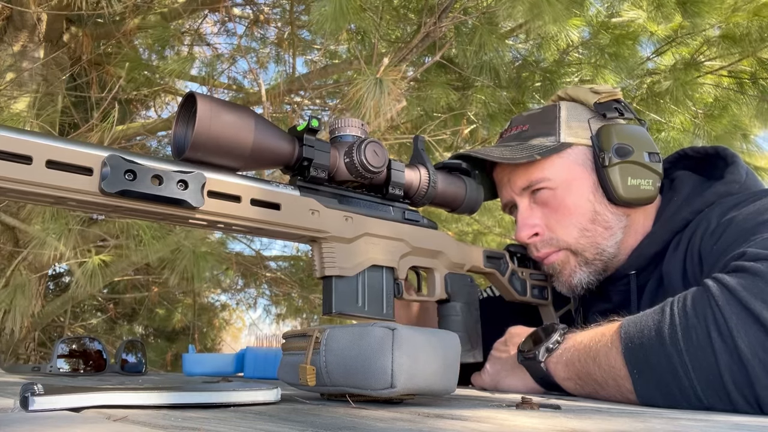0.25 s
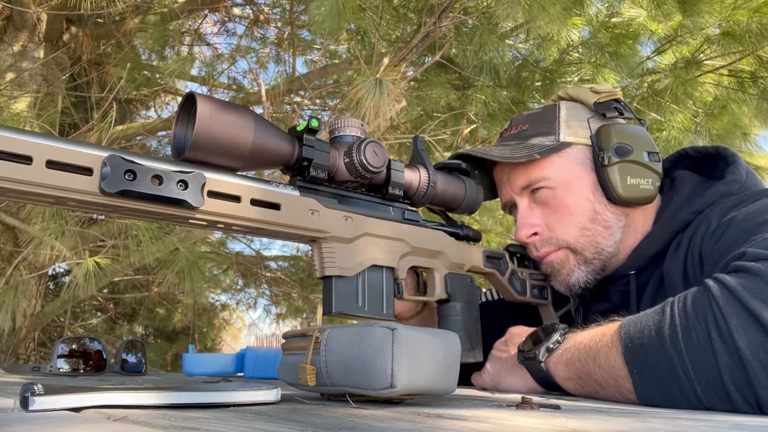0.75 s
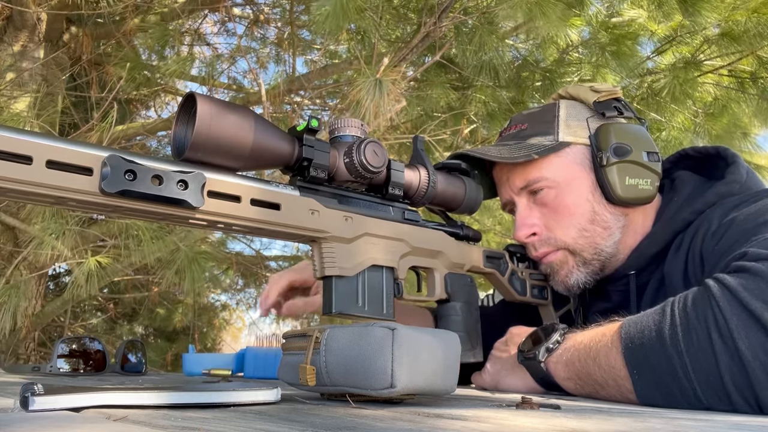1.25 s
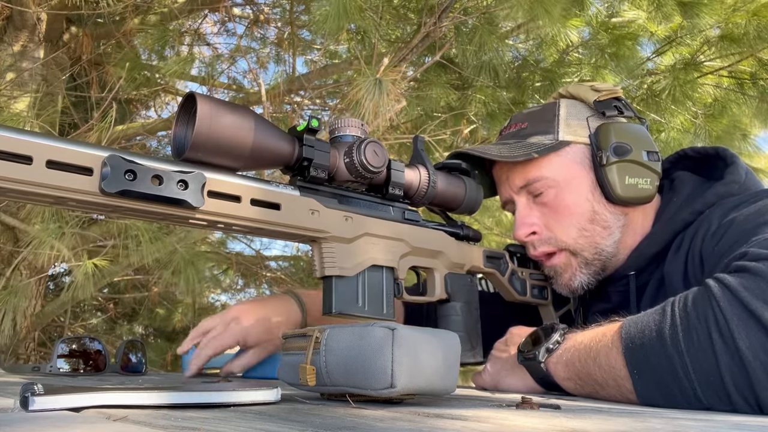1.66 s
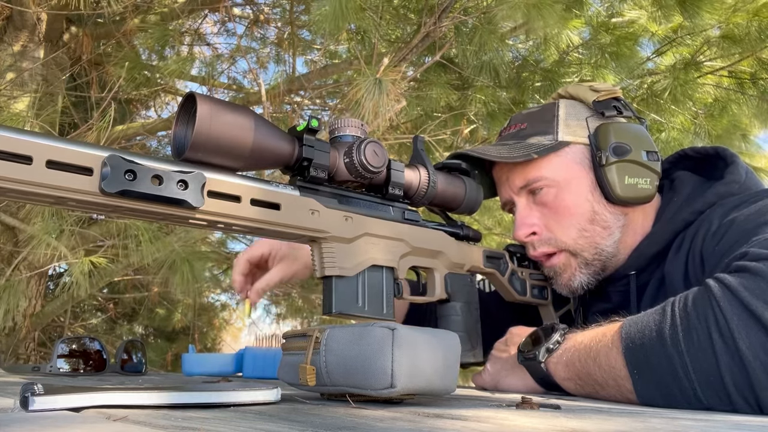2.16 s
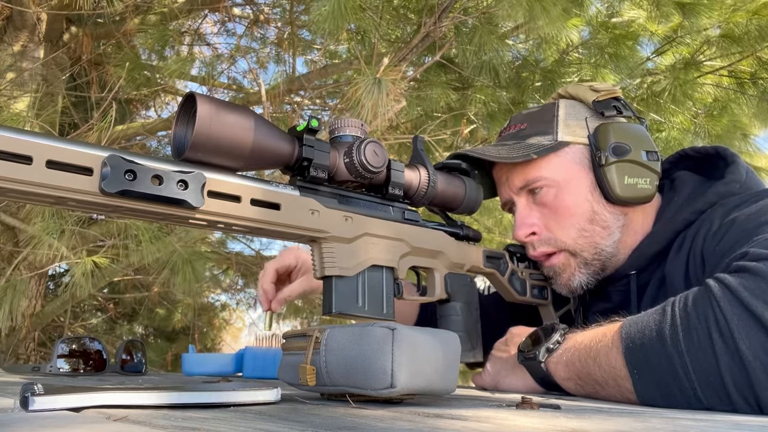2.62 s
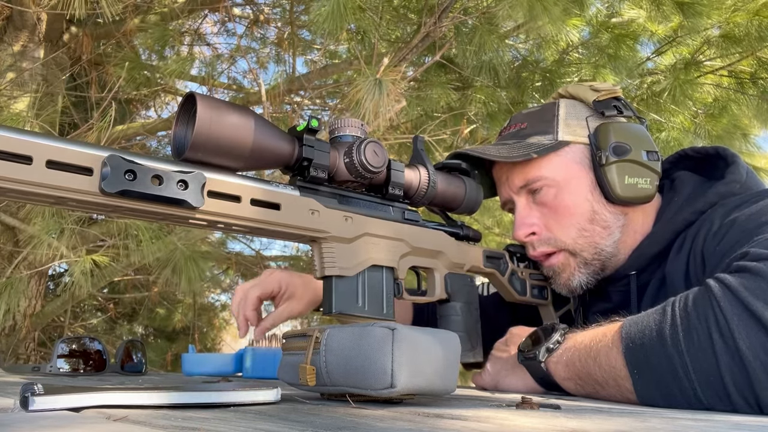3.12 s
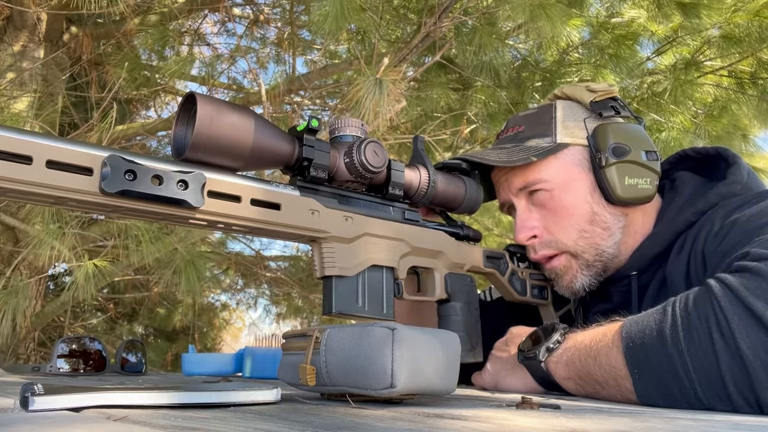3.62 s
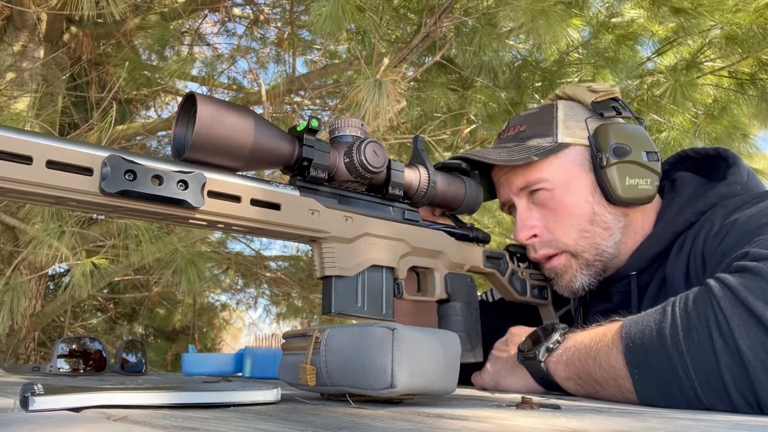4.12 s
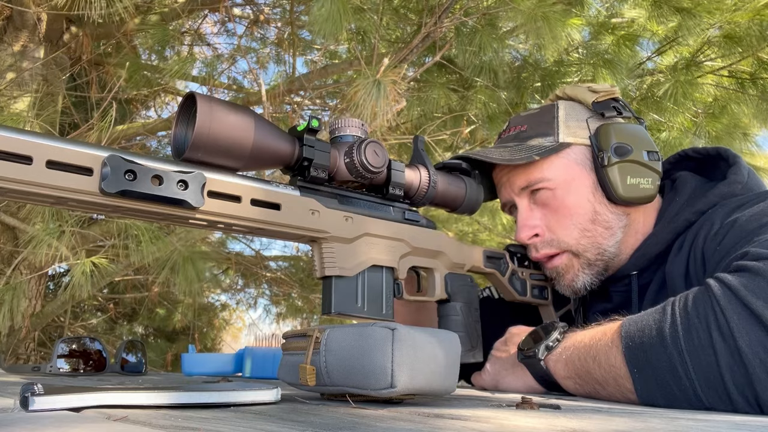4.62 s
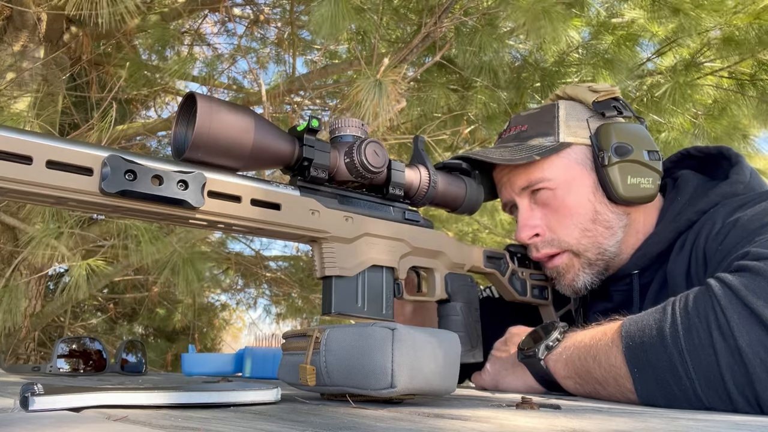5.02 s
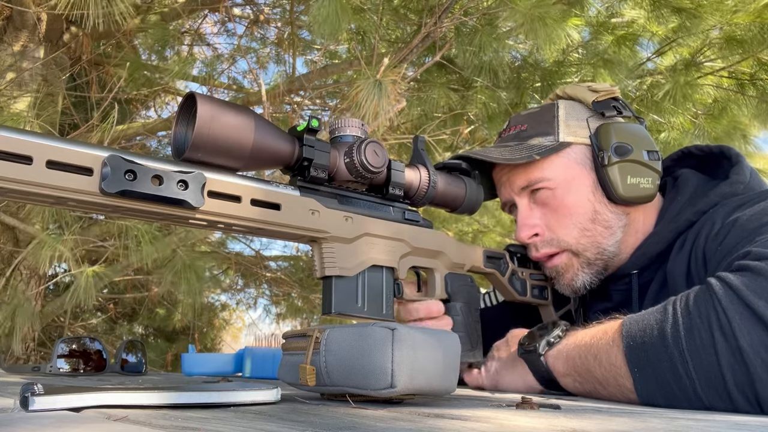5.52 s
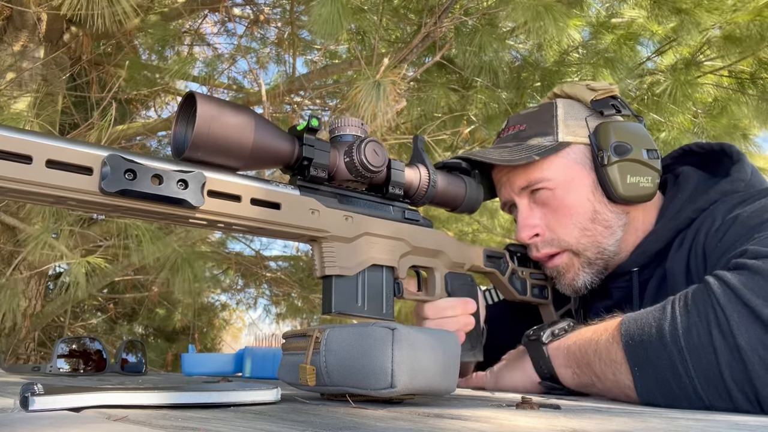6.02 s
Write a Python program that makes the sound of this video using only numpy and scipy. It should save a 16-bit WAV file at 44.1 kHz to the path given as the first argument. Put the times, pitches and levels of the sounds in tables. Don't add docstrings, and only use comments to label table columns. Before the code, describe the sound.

Close, sharp steel clacks of a rifle bolt being worked on a wooden bench outdoors, with small hand knocks and distant bird chirps.

```python
import sys
import numpy as np
from scipy import signal
from scipy.fft import rfft, irfft, next_fast_len
from scipy.io import wavfile

SR = 44100
rng = np.random.default_rng(int(sys.argv[2]) if len(sys.argv) > 2 else 0)


def boost(x):
    u = np.asarray(x, float) / 20
    return 10 ** u


def inscribe(sig):
    pcm = np.round(np.clip(np.atleast_2d(sig).T, -1, 1) * 32767)
    wavfile.write(sys.argv[1], SR, pcm.astype(np.int16))


N = 276286

# (pitch [Hz], level [dB], time to fall 60 dB [s])
STEEL_MODES = [(2000, -7, 0.012), (2850, -14, .05), (3200, -5, .013), (4100, -6.5, .008), (5300, -1, .011),
               (6208, -5, .013)]
# (pitch [Hz], level [dB], time to fall 60 dB [s])
STEEL_TOP_MODES = [(11600, 5.9, .004), (13200, 4, 0.0035)]
# (pitch [Hz], level [dB], time to fall 60 dB [s])
CHASSIS_MODES = [(370, -12.5, 0.048), (439, -11.5, 0.077), (787, -13.5, 0.13), (813.4, -8, 0.094),
                 (879, 2.5, 0.036), (914, -6, .06), (1130, -8.5, 0.022)]


def unit(x):
    return x / np.sqrt(np.mean(x ** 2) + 1e-20)


def band(x, low_hz, high_hz):
    edges = [low_hz, min(high_hz, .45 * SR)]
    return signal.sosfilt(signal.butter(2, edges, "band", fs=SR, output="sos"), x)


def low_pass(x, order, cut_hz):
    return signal.sosfilt(signal.butter(order, cut_hz, fs=SR, output="sos"), x)


def at_hz(points, hz):
    table_hz, value = np.transpose(points)
    return np.interp(np.log(hz), np.log(table_hz), value)


def drift(rate, rows=1):
    knots = rng.standard_normal((rows, 700))
    return np.array([np.interp(np.arange(N) * rate / SR, np.arange(700), k) for k in knots])


def decays(modes, seconds=0.23):
    hz, db, t60 = np.transpose(modes)[:, :, None]
    t = np.arange(int(seconds * SR)) / SR
    return boost(db - 60 * t / t60) * np.sin(2 * np.pi * hz * t)


def add(track, s, sound):
    i = int(s * SR)
    track[i:i + len(sound)] += sound[:N - i]


def grains(per_s, size_db):
    sizes = boost(size_db * np.minimum(rng.exponential(1, N), 5)) * rng.choice([-1, 1], N)
    return sizes * (rng.random(N) < per_s / SR)


def strokes(rows, rise_s, fall_s, tail_db, tail_s):
    t, out = np.arange(N) / SR, 0
    for s, length, *level_db in rows:
        after = np.maximum(t - s - length, 0)
        swell = np.exp(np.minimum(t - s, 0) / rise_s)
        fall = np.exp(-after / fall_s) + boost(tail_db) * np.exp(-after / tail_s)
        out = out + boost(level_db)[:, None] * swell * fall
    return out


def contacts(rows, bodies, edges_hz, crack_db, cloud_db, cloud_t60, accent_db, accent_t60, uneven_db, spread):
    out, t = np.zeros(N), np.arange(6000) / SR
    modes = [decays(b, seconds=6000.5 / SR) for b in bodies]
    lead_s, early = 0.012, t[:1300]
    lead_in = boost(-21) * np.exp(np.minimum(early - lead_s, 0) / 0.0016) * (early < lead_s)
    chance = rng.standard_normal((len(rows), 3, 16))
    grit = rng.standard_normal((len(rows), 3, 2, 6000))
    for (s, *level_db, hz, ms), luck, noise in zip(rows, chance, grit):
        for k in range(3):
            touch_s = max(ms, .2) / 1000 * (.45, .35, .6)[k]
            life = np.maximum(early - lead_s, 0) / touch_s
            body = boost(uneven_db * luck[k, :len(modes[k])]) @ modes[k]
            body += boost(cloud_db[k] - 60 * t / cloud_t60[k]) * noise[k, 1]
            if k == 0:
                body += boost(accent_db - 60 * t / accent_t60) * np.sin(2 * np.pi * hz * t)
            body[0] += boost(crack_db[k])
            burst = noise[k, 0, :1300] ** 3 * (life ** 2 * np.exp(-life) + lead_in)
            sound = band(signal.fftconvolve(burst, body), *edges_hz[k])
            if k == 0:
                sound = band(sound, hz / spread, hz * spread)
                sound = band(sound, hz / spread ** 1.3, hz * spread ** 1.3)
            add(out, s - lead_s - .0003, boost(level_db[k]) * sound / np.abs(sound).max())
    return out


def bolt_contacts():
    # (time [s], clack level [dB], top level [dB], chassis level [dB], strongest ring [Hz])
    opening = [(0.179, -38.5, -54, -38, 3110), (0.2969, -44.5, -62, -39.5, 2500),
               (0.3089, -24.5, -35.5, -31, 1860), (0.4411, -27, -47, -35, 1850),
               (0.4609, -25, -43, -36.5, 2900), (0.478, -27.5, -36, -39, 3140),
               (0.483, -21.5, -29.5, -34.5, 3140), (0.4991, -13.5, -13.5, -29.5, 5610),
               (0.509, -26, -33.5, -36.5, 5300), (0.5314, -24, -28.5, -39.5, 4720),
               (0.536, -24, -28.5, -41.5, 4720), (0.558, -20, -26, -29, 4100),
               (0.5741, -24.5, -32.5, -32.5, 3300), (0.586, -28.5, -32, -34, 3500),
               (0.5982, -33.5, -43, -29, 3500), (0.619, -31.5, -40, -26.5, 3200),
               (0.6235, -20.5, -23.5, -25.5, 3440), (0.6342, -18.5, -27.5, -12.5, 3040),
               (0.646, -28.5, -36.5, -24.5, 3800), (0.6561, -29, -40, -32, 4000),
               (0.663, -32, -44.5, -34.5, 3400), (0.717, -54.5, -73.5, -50.5, 3400)]
    # (time [s], clack level [dB], top level [dB], chassis level [dB], strongest ring [Hz])
    closing = [(3.7721, -64.5, -94.5, -50.5, 1600), (3.865, -22.5, -30, -28, 3300),
               (3.8692, -7.5, -10, -8.5, 3210), (3.915, -11.5, -10, -15.5, 4500),
               (3.985, -48.5, -61.5, -50.5, 3400), (4.182, -63.5, -81.5, -54.5, 3200),
               (4.241, -38.5, -81, -42, 3000), (4.2794, -24, -23.5, -30.5, 5770),
               (4.3351, -47.5, -70, -40.5, 3000), (4.4159, -42.5, -58, -35.5, 1800),
               (4.4488, -43, -66, -38, 3080), (4.4802, -33.5, -51, -36, 4800),
               (4.5007, -12.5, -20, -22.5, 3970), (4.509, -24.5, -36, -24.5, 3300),
               (4.5198, -6.5, -11, -15, 4810), (4.529, -15, -22, -19.5, 4200),
               (4.54, -17.5, -26, -25, 4800), (4.5503, -23.5, -29, -36, 4000), (4.57, -31, -48, -42, 4500),
               (4.594, -30.5, -34, -40.5, 3500), (4.601, -23, -32, -31, 3490), (4.609, -29, -34, -35, 3600),
               (4.6529, -27.5, -45, -40.5, 4040), (4.6684, -23.5, -29, -30.5, 3160),
               (4.676, -28, -40.5, -28, 4200), (4.689, -46, -59, -42, 3200), (4.77, -50, -69, -46.5, 3000),
               (4.7829, -64.5, -70, -71, 5200), (4.8982, -71, -94, -49.5, 3000),
               (5.023, -6.5, -10, -17.5, 5200), (5.014, -45, -60, -38, 3000), (5.0444, -44, -52, -42, 2850),
               (5.073, -23, -18.5, -45, 3890), (5.225, -20, -27, -19, 3170), (5.2305, -28, -36, -19, 5000)]
    touch_ms, ms_per_db = 1.3, 0.06
    rows = [(*row, touch_ms - ms_per_db * row[1]) for row in opening + closing]
    return contacts(rows, (STEEL_MODES, STEEL_TOP_MODES, CHASSIS_MODES),
                    ((1280, 7600), (7500, 14000), (302, 1400)), crack_db=(22, 22, 5),
                    cloud_db=(-11, -14, -4), cloud_t60=(.065, .035, .09),
                    accent_db=-2, accent_t60=.012, uneven_db=4.5, spread=3.4)


def slides():
    # (time [s], length [s], rasp level [dB], chassis level [dB])
    pushes = [(.16, 0.076, -71, -57), (.31, .04, -65.5, -51), (.455, 0.058, -40.5, -40),
              (.51, 0.14, -43, -44), (3.85, 0.012, -61.5, -57), (3.88, 0.073, -46.5, -37),
              (4.22, 0.1, -58, -49), (4.43, 0.046, -55, -45.5), (4.49, 0.066, -40, -45),
              (4.575, 0.094, -41.5, -46), (5.02, 0.032, -58.5, -42), (5.1, 0.12, -58.5, -56),
              (4.0, 0.17, -79, -66.5), (5.26, 0.1, -72.5, -74.5), (4.74, 0.057, -73, -64)]
    rasp = grains(per_s=6000, size_db=3.8) * boost(4.0 * drift(80)[0])
    steel, chassis = strokes(pushes, rise_s=0.014, fall_s=0.0067, tail_db=-20, tail_s=.07)
    top = boost(-0.5) * steel ** 1.4
    layers = [(steel, STEEL_MODES, 27, (1200, 7000)),
              (top, STEEL_TOP_MODES, 25, (8000, 14500)),
              (chassis, CHASSIS_MODES, 24, (170, 1400))]
    out = 0
    for gain, body, crack_db, edges in layers:
        answer = decays(body).sum(axis=0)
        answer[0] += boost(crack_db)
        scrape = signal.fftconvolve(rasp, answer)[:N]
        out = out + gain * unit(band(band(scrape, *edges), *edges))
    return out


def long_rings():
    # (time [s], pitch [Hz], level [dB], time to fall 60 dB [s])
    metal = [(0.63, 930, -36, 0.39), (4.283, 5775, -12, 0.023), (4.285, 5770, -47.5, 0.23),
             (4.669, 7300, -55, 0.11), (5.074, 3750, -22, 0.018), (.635, 1300, -18, 0.021),
             (5.03, 2800, -39, 0.075), (0.18, 3700, -38, 0.041), (0.309, 2880, -51, 0.09),
             (3.92, 904, -35.5, .2), (3.92, 1000, -42, 0.35), (3.92, 3700, -39.5, 0.13),
             (3.92, 4030, -45, 0.13), (3.92, 6170, -49.5, .13), (3.872, 4700, -27.5, .06)]
    # (time [s], level [dB], time to fall 60 dB [s])
    tinkles = [
        (.498, -39, .06),
        (.574, -32, 0.15),
        (.866, -57.5, .15),
        (.945, -57.5, .1),
        (.982, -53, 0.082),
        (1.165, -64, .1),
    ]
    # (time [s], level [dB], pitch [Hz], time to fall 60 dB [s])
    thumps = [(0.324, -47.5, 90.7, 0.23), (0.498, -32.5, 77.26, 0.19), (.84, -35.5, 69.37, 0.26),
              (3.884, -38.5, 97.1, 0.055), (3.925, -24.5, 97.1, 0.16), (3.929, -38, 194.7, 0.34),
              (4.528, -33.5, 100, 0.17), (5.037, -34.5, 186.7, 0.312), (5.038, -42.5, 95.4, 0.47),
              (5.242, -34, 58.1, 0.45), (5.239, -35, 98.9, 0.095)]
    brass_hz = 14020
    tones = metal + [(s, brass_hz, db, t60) for s, db, t60 in tinkles]
    tones = tones + [(s, hz, db, t60) for s, db, hz, t60 in thumps]
    out = np.zeros(N)
    for s, hz, db, t60 in tones:
        tone = decays([(hz, db, t60)], seconds=.5)[0]
        swell = np.minimum(np.arange(len(tone)) * hz / SR / 0.35, 1)
        add(out, s, tone * swell)
    return out


def bench(knocks):
    # (pitch [Hz], level [dB], time to fall 60 dB [s])
    box = [(946.5, -10, 0.03), (1280, -11, 0.025), (1596, -2.5, 0.011), (2100, -4, 0.006),
           (2500, -6, 0.005), (3432, -1, 0.004)]
    # (pitch [Hz], level [dB], time to fall 60 dB [s])
    box_top = [(4240, 0.5, .004), (6200, -2, .004)]
    # (pitch [Hz], level [dB], time to fall 60 dB [s])
    plank_modes = [(307, -0.5, 0.064), (390, 14, 0.026), (459.6, 12.5, 0.037), (583, -22.5, 0.017)]
    sound = contacts(knocks, (box, box_top, plank_modes), ((600, 5000), (2700, 7200), (237.0, 750)),
                     crack_db=(18, 18, 5), cloud_db=(-12, -14, -3), cloud_t60=(.035, .02, .06),
                     accent_db=2, accent_t60=.007, uneven_db=5.5, spread=1.875)
    return low_pass(sound, 1, cut_hz=6000)


def case_bounces():
    # (time [s], knock level [dB], top level [dB], plank level [dB], strongest ring [Hz])
    bounces = [(0.822, -30, -55, -40.5, 1000), (0.83, -7, -28, -21, 1430), (0.8661, -20.5, -29, -36, 1320),
               (0.866, -24.5, -40, -45, 2900), (0.9209, -16.5, -30, -27, 1490),
               (0.945, -23, -37.5, -30, 1320), (0.972, -23, -35, -34.5, 1420),
               (0.9805, -25.5, -32.5, -32.5, 1330), (1.0041, -38, -52.5, -35.5, 1100),
               (1.0204, -36, -52, -38, 1500), (1.0708, -22, -31.5, -34, 1606),
               (1.0863, -34.5, -54.5, -32, 1010), (1.1552, -20, -24, -39, 3200)]
    touch_ms = 1.7
    return boost(0.78) * bench([(*row, touch_ms) for row in bounces])


def hand_knocks():
    # (time [s], knock level [dB], top level [dB], plank level [dB], strongest ring [Hz])
    handling = [(1.5222, -70, -80, -57, 1210), (1.5612, -25, -32, -44, 3300), (1.5955, -40, -44, -51, 1500),
                (1.6606, -59, -74, -44.5, 1201), (1.7245, -47.5, -52, -60, 1360),
                (1.7445, -54, -56, -66, 1500), (1.8335, -48, -56, -60, 3000), (1.8415, -48, -56, -58, 3200),
                (1.8546, -37, -46, -42, 3200), (1.8585, -41, -50, -44, 3200), (1.878, -54, -60, -50, 3300),
                (1.8612, -29.5, -44.5, -24, 1220), (2.8967, -27, -32.5, -49, 2497),
                (2.9048, -30.5, -39, -40.5, 2330), (2.9114, -29, -45, -45, 2340),
                (2.9443, -28, -35.5, -29, 1894), (2.953, -30, -52, -37, 1490),
                (2.9636, -38, -46, -54, 1400), (3.0175, -46, -52, -42.5, 1300),
                (3.051, -46, -56, -48, 1500), (3.0582, -41, -43, -47, 1550),
                (3.0671, -41.5, -48, -58.5, 1550), (3.1064, -49, -55.5, -69, 1300),
                (3.154, -48.5, -58, -61, 1410), (3.172, -45, -57, -46, 900),
                (3.1813, -20, -31.5, -17.5, 1083), (3.1831, -22.5, -46, -26.5, 2100),
                (3.1923, -31.5, -49, -27.5, 1255), (3.225, -18.5, -33.5, -26, 2100),
                (3.232, -29, -37, -34.5, 1300), (3.2386, -27.5, -48, -32.5, 1920),
                (3.2925, -44.5, -66, -48, 1900), (3.322, -50, -69, -50.5, 1500),
                (6.0081, -72.5, -84, -71, 2750), (6.0793, -61, -70, -67, 2000)]
    touch_ms = 1.25
    return bench([(*row, touch_ms) for row in handling])


def rubs():
    # (time [s], length [s], rustle level [dB], plank level [dB])
    touches = [(.005, 0.02, -74, -52.5), (.84, 0.065, -86.5, -42), (.95, .17, -81, -51),
               (1.54, 0.084, -77, -58), (1.83, 0.066, -83.5, -57), (2.92, 0.072, -86.5, -51.5),
               (3.05, 0.02, -89.5, -79), (3.15, 0.091, -93.5, -53), (3.26, 0.064, -96, -56),
               (.3, 0.36, -90, -54), (3.95, 0.045, -94, -51.5), (4.25, 0.49, -88, -56),
               (5.04, 0.28, -91.5, -57.5), (5.47, 0.15, -79, -62.5), (5.66, 0.16, -83.5, -76),
               (6.12, 0.12, -86.5, -70.5)]
    rustle, plank = strokes(touches, rise_s=0.027, fall_s=0.066, tail_db=-13.5, tail_s=0.054)
    fibres = np.array([grains(per_s=9000, size_db=2.5) for side in "LR"]) * boost(2.5 * drift(40))
    bright = unit(band(band(fibres, 1900, 6200), 830, 11000))
    dull = unit(band(fibres[::-1], 130, 600))
    return boost(3.0) * rustle * bright + boost(-5.0) * plank * dull


def ports(x, lead):
    # (pitch [Hz], phase [radians])
    port_phase = [(60, 0.), (180, 2), (380, 1.65), (800, 0.5), (1300, 1.71), (2600, 1.57), (5000, 2),
                  (14000, 1.81)]
    # (pitch [Hz], level [dB])
    port_balance = [(60, 1.0), (130, 0.0), (290, -2.5), (640, -2.0), (1410, 0.5), (3100, 2), (6820, 1.5),
                    (15000, -0.5)]
    size = next_fast_len(N + 4096)
    hz = np.maximum(np.arange(size // 2 + 1) * SR / size, 1)
    half = np.exp(.5j * lead * at_hz(port_phase, hz)) * boost(at_hz(port_balance, hz) / 2)
    return irfft(rfft(x, size) * np.array([half, 1 / half]), size)[:, :N]


def trees(x, t60):
    t = np.arange(int(.4 * SR)) / SR
    scatter = rng.standard_normal((2, len(t))) * boost(-60 * t / t60) * (t > .004)
    scatter /= np.sqrt(np.sum(scatter ** 2, axis=1, keepdims=True))
    return signal.fftconvolve(x[None], scatter, axes=1)[:, :N]


def birds():
    # (time [s], level [dB])
    calls_at = [(0.018, -62.5), (0.815, -55), (1.095, -56.5), (1.338, -74), (2.25, -70), (2.518, -69),
                (2.694, -60.5), (2.971, -57), (3.252, -57.5), (3.508, -60), (5.41, -64.5), (5.669, -61),
                (5.825, -67), (5.94, -63), (6.089, -64.5)]
    # (delay [s], length [s], start pitch [Hz], end pitch [Hz], level against the call [dB])
    pips = [(0.124, .03, 2805, 2636, -4), (.165, 0.022, 2250, 2214, -8.5)]
    # (time [s], length [s], start pitch [Hz], end pitch [Hz], level [dB])
    short_notes = [(1.469, 0.027, 2750, 2700, -71), (2.116, .17, 2480, 2450, -79),
                   (2.65, .23, 2470, 2450, -70), (2.76, .05, 3280, 3260, -70),
                   (2.811, 0.071, 2800, 2414, -61.5), (3.39, .03, 2240, 2194, -65),
                   (3.585, .04, 3280, 3300, -72.5), (3.64, .05, 2750, 2220, -62.5),
                   (3.69, .11, 2440, 2455, -64.5), (3.695, 0.034, 3200, 3280, -70),
                   (3.602, .15, 4900, 4840, -87), (4.098, .055, 2460, 2436, -67.5),
                   (4.168, 0.027, 3200, 3240, -68), (6.225, 0.027, 2720, 2675, -66),
                   (1.235, .04, 2760, 2710, -65)]
    whistles = [(s, .12, .052, 3000, 2230, db) for s, db in calls_at]
    endings = [(s + late, *pip, db + less_db) for s, db in calls_at for late, *pip, less_db in pips]
    for s, length, start_hz, end_hz, db in short_notes + endings:
        whistles.append((s, length, 0.1 * length, start_hz, end_hz, db))
    out = np.zeros(N)
    for s, length, hold, start_hz, end_hz, db in whistles:
        t = np.arange(int(length * SR)) / SR
        fall = np.clip((t - hold) / max(length - hold, .01), 0, 1)
        hz = start_hz + (end_hz - start_hz) * (1 - np.cos(np.pi * fall)) / 2
        hz = hz + 47.0 * np.sin(np.pi * np.minimum(t / max(hold, .01), 1))
        shape = np.sin(np.pi * t / length) ** 0.4 * boost(-5.0 * fall)
        add(out, s, boost(db - 6) * shape * np.sin(2 * np.pi * np.cumsum(hz) / SR))
    sides = out * boost([[-3.0], [1.5]])
    return sides + boost(-9) * trees(out, t60=0.2)


def road():
    # (time [s], length [s], level [dB])
    whines = [
        (2.08, 0.2, -74),
        (3.6, 0.69, -75.5),
        (4.75, 0.044, -76),
        (5.45, 0.15, -77.5),
        (5.95, 0.18, -77),
    ]
    whine_hz, spread = 1380, 1.09
    hiss = band(rng.standard_normal((2, N)), whine_hz / spread, whine_hz * spread)
    return unit(hiss) * strokes(whines, rise_s=0.26, fall_s=0.26, tail_db=-38, tail_s=.1)


def low_rumble():
    # (time [s], level [dB])
    far = [
        (0.0, -44.5),
        (0.38, -51),
        (0.91, -50.5),
        (1.22, -55),
        (2.81, -57),
        (3.75, -61),
        (4.3, -52.5),
        (5.0, -55.5),
        (5.98, -62.5),
        (6.26, -51.5),
    ]
    # (time [s], level [dB])
    jolts = [
        (.002, -44),
        (0.519, -42),
        (3.0, -49),
        (3.25, -47.5),
        (4.378, -47),
        (3.94, -32.5),
        (4.551, -41.5),
        (4.71, -43),
        (5.06, -45),
        (5.27, -39.5),
    ]
    t = np.arange(N) / SR
    s, db = np.transpose(far)
    fade = np.clip(np.minimum(t - s[0] + .01, s[-1] + .01 - t) / .02, 0, 1)
    sway = strokes([(when, 0.021, level) for when, level in jolts],
                   rise_s=0.051, fall_s=0.024, tail_db=-26.5, tail_s=0.11)
    swell = boost(np.interp(t, s, db)) * fade + sway
    mid, side = band(band(rng.standard_normal((2, N)), 45, 110), 27, 200)
    wide = unit(mid + .85 * side * [[1], [-1]])
    return wide * swell * boost([[.8], [-.8]])


def faint_air():
    # (pitch [Hz], level per Hz [dB])
    air_curve = [(150, -8.5), (216, -12), (567, -24.5), (1150, -18), (2020, -26), (7500, -44),
                 (11000, -39.5), (15000, -55.5)]
    white, edges, air = rng.standard_normal((2, 2, N)), 150 * 2 ** np.arange(0, 6.6, .5), 0
    for k, (low, high, patch) in enumerate(zip(edges, edges[1:], drift(3.0, rows=13))):
        level_db = at_hz(air_curve, np.sqrt(low * high)) + 1.8 * patch
        air = air + boost(level_db) * band(white[k % 2], low, high)
    return boost(-73.5) * unit(air)


def mains_hum():
    hum_hz, hum_db = 119, -70
    return boost(hum_db + 0.83 * drift(1.7)) * np.sin(2 * np.pi * hum_hz * np.arange(N) / SR)


def scene():
    rifle = boost(2.0) * bolt_contacts() + long_rings() + boost(-5.0) * slides()
    case, hand = case_bounces(), hand_knocks()
    hand_pan = boost([[-.5], [.5]])
    direct = ports(rifle, lead=0.93) + ports(case, lead=-0.71) + ports(hand, lead=-0.67) * hand_pan
    near = band(rifle + case + hand, 220, 8700)
    bench_echo = boost(-12.0) * trees(near, t60=0.049)
    tree_echo = boost(-27.0) * trees(band(near, 300, 3900), t60=0.29)
    background = road() + faint_air() + boost(-1.5) * low_rumble() + mains_hum()
    return direct + bench_echo + tree_echo + rubs() + birds() + background


def top_cut(x):
    return signal.sosfilt(signal.butter(12, 16810, fs=SR, output="sos"), x)


def record(dry):
    dry = signal.sosfilt(signal.butter(2, 32, "high", fs=SR, output="sos"), dry)
    rounded = 1.069 * np.tanh(dry / 0.82)
    mix = low_pass(rounded, 8, cut_hz=14700)
    return top_cut(mix)


dry = scene()
out = record(dry)
inscribe(out)
```